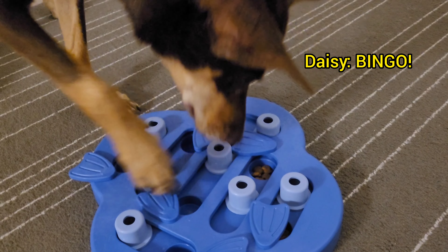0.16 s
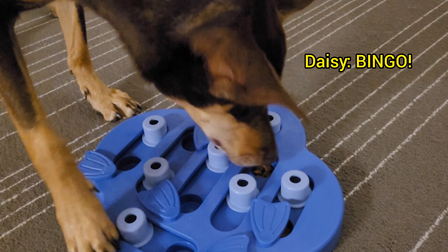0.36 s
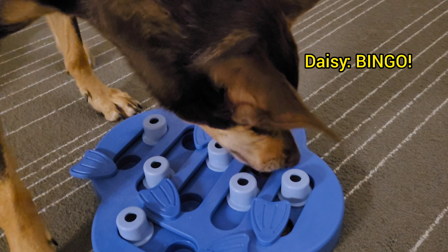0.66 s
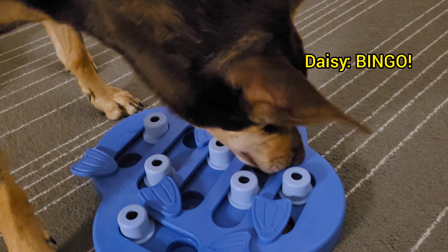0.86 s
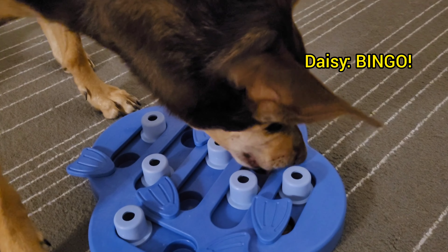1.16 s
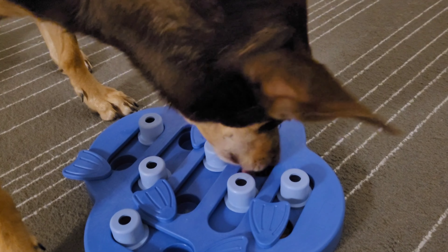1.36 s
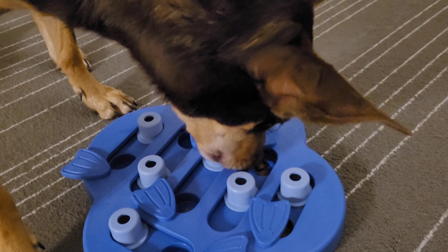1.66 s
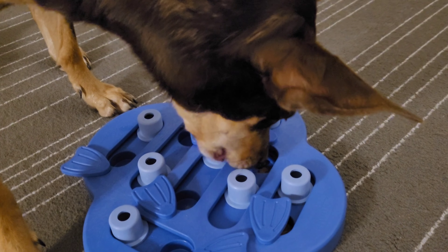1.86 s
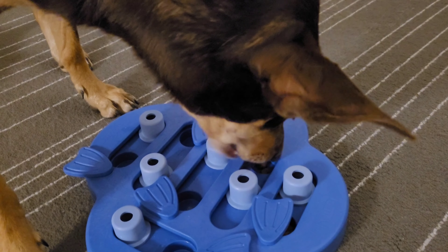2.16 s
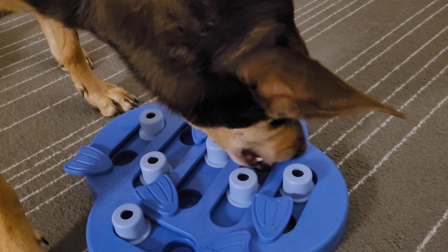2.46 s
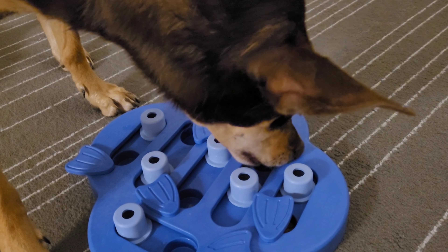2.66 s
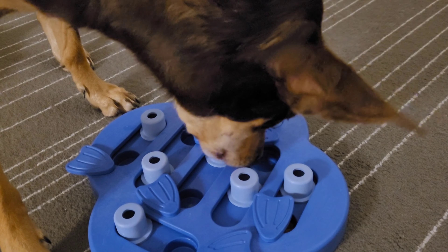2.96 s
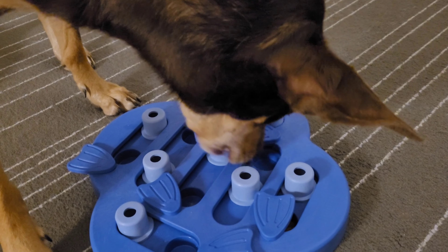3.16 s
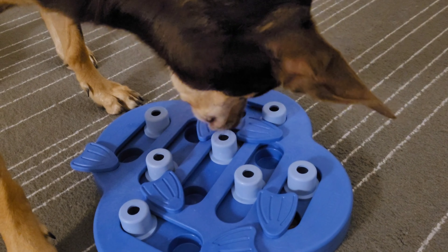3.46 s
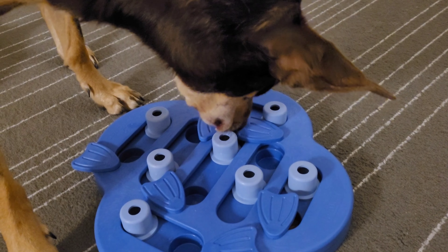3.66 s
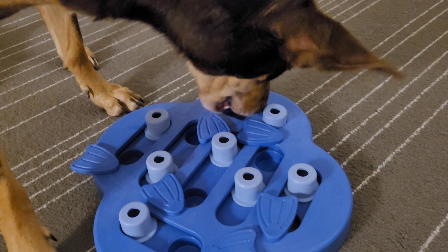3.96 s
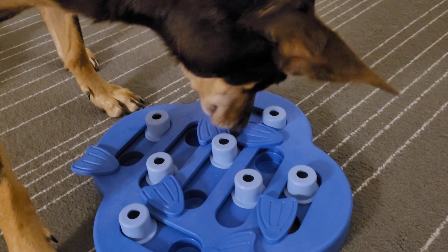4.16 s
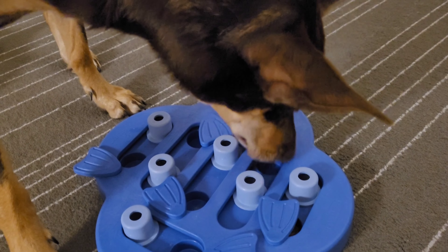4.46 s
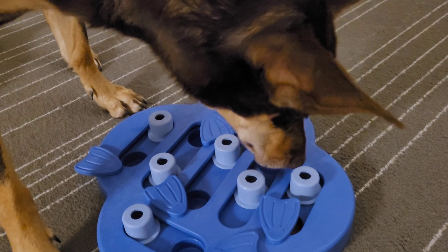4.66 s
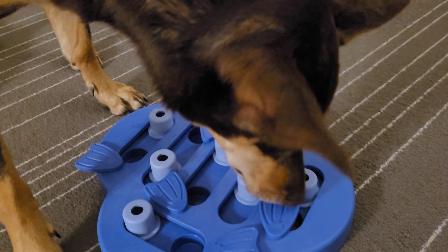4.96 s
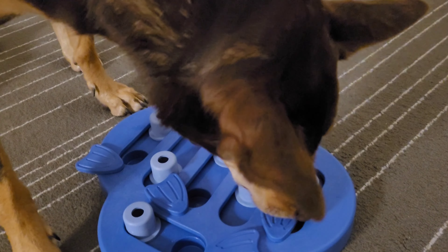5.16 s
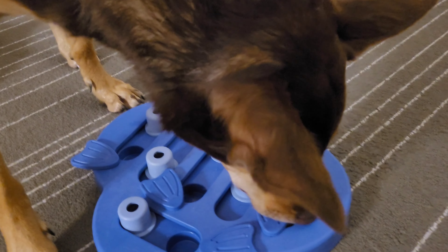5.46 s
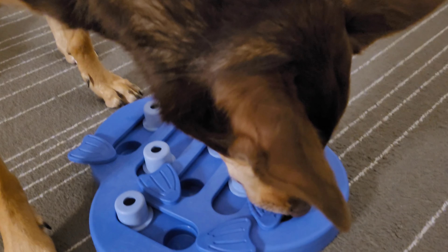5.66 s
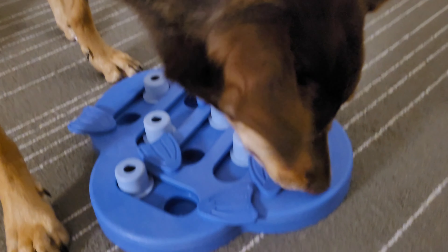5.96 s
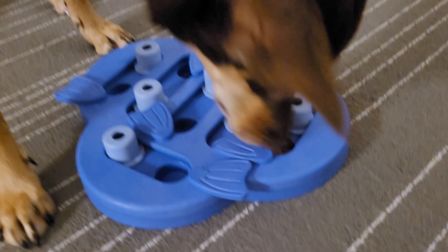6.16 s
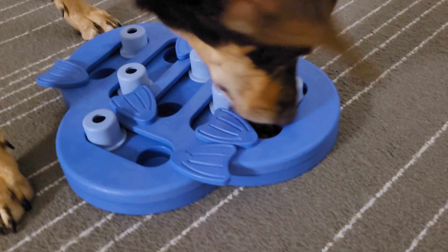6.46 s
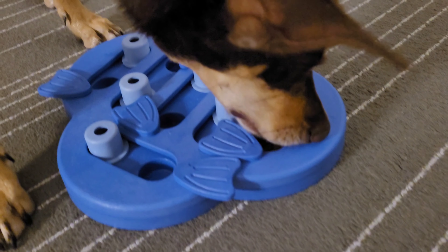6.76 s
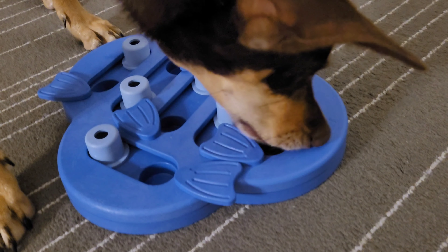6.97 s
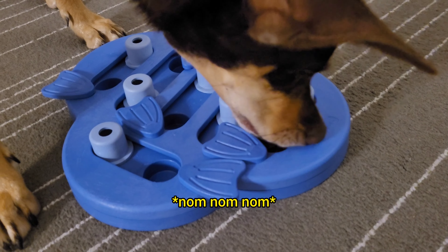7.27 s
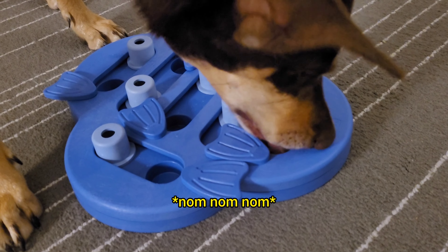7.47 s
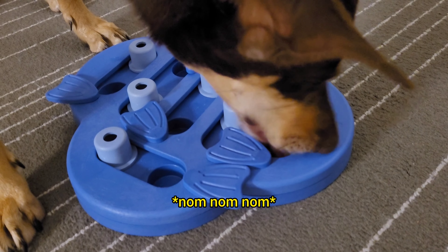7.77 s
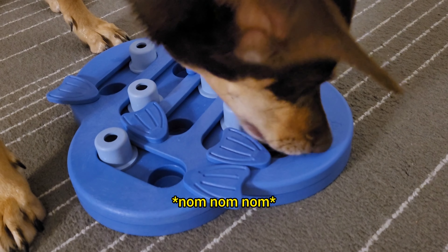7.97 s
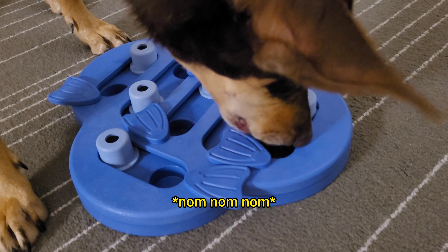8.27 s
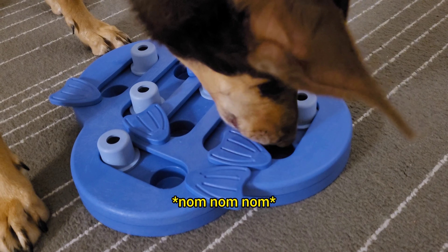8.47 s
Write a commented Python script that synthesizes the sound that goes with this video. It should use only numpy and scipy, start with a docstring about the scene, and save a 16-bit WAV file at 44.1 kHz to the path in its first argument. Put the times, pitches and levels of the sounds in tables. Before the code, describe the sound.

Hollow plastic clacks and scrapes come in scattered bursts as a dog works a treat tray, smacking its lips and licking at a rattling peg.

```python
"""Dog at a treat puzzle

A dog noses treats out of a hollow plastic tray on a living-room carpet. Sliders and lids scrape and
knock, ringing the tray's modes; teeth tick on it, fur brushes it, lips pop the mouth cavity, and the
tongue rattles a peg in a cup. Paws and the shifting tray thump through the carpet.
An appliance's faint hum and high whine hang in the room."""
import sys
import numpy as np
from scipy import signal
from scipy.fft import rfft, irfft, next_fast_len
from scipy.io import wavfile
from scipy.ndimage import uniform_filter1d, map_coordinates

SR = 44100
rng = np.random.default_rng(int(sys.argv[2]) if len(sys.argv) > 2 else 0)


def int16_out(signal):
    """Quantize to a 16-bit WAV file."""
    q = np.round(np.clip(np.atleast_2d(signal).T, -1, 1) * 32767)
    wavfile.write(sys.argv[1], SR, q.astype(np.int16))


N = 380121
HIT = 4096  # samples per contact

# blows on the tray: (time [s], level [dB], favoured ring [Hz], weight = body over clack [dB],
# hardness = snap over level [dB], room send [dB])
KNOCKS = [(0.0144, -33.5, 650, 10, -18, -5), (0.022, -36.5, 493, 1, -7.5, 3.5),
          (0.3012, -42.5, 1880, -7, 5, 3), (0.3647, -52, 1780, -6, -15, 8.5),
          (0.5452, -54.5, 630, 1.5, -11, 7.5), (0.938, -34, 735, 11, -28.5, -3.5),
          (0.9445, -36, 660, 3, -14.5, 1), (1.0657, -26, 1420, -9, -2, 0.5), (1.3681, -29, 750, 1, -9, 4),
          (1.4405, -32, 525, 4.5, -27, -3), (1.4565, -40, 616, 2, -9, 3), (1.5221, -44, 2100, -5, -13.5, 4),
          (1.8691, -56, 740, 1, -2.5, 13.5), (1.9198, -39, 1320, -1.5, -4.5, 3.5),
          (1.9616, -39, 2070, -7, -4.5, 3), (2.4943, -43, 600, 19, -20, 3.5),
          (2.8146, -27.5, 1220, 3.5, -13.5, 6), (2.8715, -31.5, 790, 2, -22, 1.5),
          (3.049, -42.5, 646, 10, -12.5, -0.5), (3.1006, -48, 630, 10.5, -30, -7),
          (3.1901, -32, 640, 3.5, -15.5, 4.5), (3.2973, -33, 855, 4, -13.5, -4),
          (3.5921, -48, 455, 18, -32, 1), (3.6455, -41, 706, 5, -30, 1),
          (3.8256, -40.5, 810, 7.5, -31, -3.5), (3.8591, -31, 1830, 3.5, -46, -4),
          (3.8668, -35.5, 770, 0, -20, 4.5), (4.0959, -38, 800, 30, -32, -2),
          (4.3538, -59.5, 785, 8, -20, 6), (4.498, -48, 687, 5.5, -7, 3.5),
          (4.714, -32, 1330, -11.5, -22.5, 3.5), (4.7515, -29.5, 1980, -20, -30, -4),
          (4.765, -29.5, 1860, -11, -23, -1.5), (5.1964, -68.5, 533, 0.5, -21, 10.5),
          (6.0933, -36, 417, 3, -9.5, 5.5), (6.1098, -43, 790, -1.5, -13, 5),
          (8.1565, -18.5, 1800, -6, -13.5, 4), (8.3409, -32.5, 740, 9.5, -6.5, -2.5),
          (8.4711, -34.5, 710, 4, -8, 1)]
# tray modes: (frequency [Hz], level [dB], t60 [s])
TRAY_MODES = [(287, -5.5, 0.062), (392.5, -7.5, 0.19), (464.4, 3, 0.03), (641, -3.5, 0.029),
              (743, 0.5, 0.011), (846, -6, 0.02), (1200, -10, .022), (1330, 3.5, 0.017), (1670, 6, 0.012),
              (1905, 9.5, 0.0058), (2010, 1.5, 0.013), (2530, -10, 0.01), (3320, -14.5, 0.003),
              (3670, -1, 0.022), (4737, 7.5, 0.0032), (5506, -2, 0.016)]
# tongue laps in the cup: (peak time [s], level [dB])
LAPS = [(6.82, -58.5), (6.97, -54), (7.16, -57.5), (7.37, -54), (7.7, -52.5), (7.92, -66), (8.12, -61.5)]
# thud, body, clack, snap and tick bands: (low edge [Hz], high edge [Hz])
REGISTERS = [(260, 540), (520, 1150), (1100, 2500), (2700, 7400), (8200, 16000)]
BANDS = [signal.butter(order, edges_hz, "band", fs=SR, output="sos")
         for order, edges_hz in zip((3, 3, 4, 4, 4), REGISTERS)]


def amp(db):
    """Decibels to gain."""
    return 10 ** (np.asarray(db) / 20)


def unit(x):
    """Scale to rms 1."""
    return x / np.sqrt(np.mean(x ** 2) + 1e-30)


def along(points, hz):
    """Interpolate (Hz, value) points on a log axis."""
    knots_hz, values = np.transpose(points)
    return np.interp(np.log(hz + 1), np.log(knots_hz + 1), values)


def filtered(x, response):
    """Apply the gain response(hz)."""
    size = x.shape[-1]
    padded = next_fast_len(size + HIT)
    return irfft(rfft(x, padded) * response(np.fft.rfftfreq(padded, 1 / SR)), padded)[..., :size]


def add(track, s, sound):
    """Mix a sound in at time s."""
    start = max(round(s * SR), 0)
    track[:, start:start + sound.shape[1]] += sound[:, :max(N - start, 0)]


def diffuse(colour, size=N):
    """Coloured stereo noise of rms 1, alike in the bass, unrelated in the treble."""
    # diffuse field: (frequency [Hz], left-right correlation [ratio])
    coherence = [(100, 0.78), (400, 0.78), (1000, 0.15), (2000, .1), (8000, 0.026)]

    def mid_side_gain(hz):
        angle = np.arccos(np.clip(along(coherence, hz), -1, 1)) / 2
        return amp(along(colour, hz)) * [np.cos(angle), np.sin(angle)]

    mid, side = filtered(rng.standard_normal((2, size)), mid_side_gain)
    return unit(np.array([mid + side, mid - side]))


def grainy(rate_hz, depth_db):
    """Randomly wavering gain of rms 1."""
    knots = rng.standard_normal(int(N * rate_hz / SR) + 4)
    return unit(amp(depth_db * map_coordinates(knots, [np.arange(N) * rate_hz / SR], order=1)))


def swells(strokes, rise):
    """Envelope of (peak s, length s, dB) strokes; rise is the share of the length spent rising."""
    t = np.arange(N) / SR
    envelope = np.zeros(N)
    for s, length_s, db in strokes:
        attack = ((t - s) / (rise * length_s)) ** 2
        decay = (t - s) / ((1 - rise) * length_s)
        envelope += amp(db) * np.exp(-np.where(t < s, attack, decay))
    return envelope


def sized(x, db):
    """Give a contact the energy of 10 ms at level db."""
    return amp(db) * unit(x) * np.sqrt(SR / 100 / HIT)


def voiced(x, bands, levels_db):
    """Set a contact's level band by band."""
    return sum(sized(signal.sosfilt(band, x), db) for band, db in zip(bands, levels_db))


def contact(modes, chatter_s, crack, scatter_db, width, bounce=0.43, crack_s=0.00085):
    """A blow and three rebounds ring the modes, each with a dry crack; width sets left and right apart."""
    t = np.arange(HIT) / SR
    blows = np.zeros(HIT)
    rebounds_s = np.clip((np.arange(1, 4) + rng.uniform(-.5, 0.54, 3)) * chatter_s / 2.4, 0, .03)
    blows[(rebounds_s * SR).astype(int)] = bounce * rng.choice([-1, 1], 3) * amp(rng.standard_normal(3))
    blows[0] = 1
    hz, db, t60_s = np.transpose(modes)[:, :, None]
    hz = hz * (1 + .008 * rng.standard_normal(hz.shape))
    # each rebound feeds every mode
    energy = signal.fftconvolve(amp(-120 * t / t60_s), blows[None] ** 2, axes=1)[:, :HIT]
    envelope = amp(db + scatter_db * rng.standard_normal(db.shape)) * np.sqrt(np.abs(energy))
    phase = 2 * np.pi * rng.random(hz.shape)
    skew = width * rng.standard_normal((2, len(hz), 1)) * np.minimum(hz / 2000, 1)
    ring = np.sum(envelope * np.sin(2 * np.pi * hz * t + phase + skew), axis=1)
    grit = rng.standard_normal(HIT) + width * rng.standard_normal((2, HIT))
    return ring + crack * grit * signal.fftconvolve(np.abs(blows), np.exp(-t / crack_s))[:HIT]


def room_tail(onset_s=0.0035, early_boost=0.97, early_s=0.02):
    """Room impulse response: strong first reflections, then each frequency dies at its own rate."""
    # room decay: (frequency [Hz], t60 [s])
    decay = [(150, 0.92), (450, 0.47), (1100, 0.54), (2800, 0.49), (7000, 0.53), (10000, 0.55),
             (15000, 0.38)]
    # reverberation colour: (frequency [Hz], gain [dB])
    colour = [(150, 3), (450, -5.5), (800, -4), (1800, -6.5), (5000, -7.5), (15000, -5)]
    noise = diffuse([(100, 0.028), (1000, 0.01)], size=SR // 2)
    hz, frame_s, spectra = signal.stft(noise, SR, nperseg=256)
    tail = signal.istft(spectra * amp(-60 * frame_s / along(decay, hz)[:, None]), SR, nperseg=256)[1]
    t = np.arange(tail.shape[1]) / SR
    tail = tail * (1 - np.exp(-(t / onset_s) ** 2)) * (1 + early_boost * np.exp(-t / early_s))
    return filtered(tail / np.linalg.norm(tail[0]), lambda hz: amp(along(colour, hz)))


def radiated(x):
    """Spectrum sent to the walls: summed over all directions, its treble ripples even out."""
    grid_hz = np.fft.rfftfreq(HIT, 1 / SR)
    power = np.mean(np.abs(rfft(x)) ** 2, axis=0)
    treble = np.clip((grid_hz - 2300) / 700, 0, 1)
    power = (1 - treble) * uniform_filter1d(power, size=7) + treble * uniform_filter1d(power, size=70)
    return lambda hz: np.interp(hz, grid_hz, np.sqrt(np.abs(power)))


def in_room(x, room_db, pan_db=-2, lag_s=0.0001):
    """Direct sound arrives earlier and brighter on the left; the room follows."""
    side = np.array([[.5], [-.5]])

    def direct_path(hz):
        left_over_right_db = pan_db + 9 * np.clip((hz - 4000) / 3000, 0, 1)
        return amp(side * left_over_right_db) * np.exp(2j * np.pi * hz * lag_s * side)

    direct = filtered(np.pad(x, ((0, 0), (16, 0))), direct_path)
    out = amp(room_db) * filtered(room_tail(), radiated(x))
    out[:, :direct.shape[1]] += direct
    return out


def background(air_db=-77, whine_db=-77):
    """Quiet room air with an appliance's wavering hum and high whine."""
    # air and whine spectra: (frequency [Hz], density [dB])
    air_colour = [(20, -21), (40, -18), (62, -4), (95, -4.5), (190, -11), (380, -5.5), (600, -11),
                  (950, -16), (2000, -20), (3000, -34), (4800, -27.5), (7900, -19.5), (9300, -26),
                  (16000, -27.5)]
    whine_colour = [(2900, -44.5), (3400, -17.5), (3850, 0.5), (4050, -17), (4400, -50), (6000, -61.5)]
    # appliance tones: (frequency [Hz], level [dB])
    tones = [(233, -85), (1071, -90.5), (3903, -83), (8048, -88.5), (8215, -94)]
    t = np.arange(N) / SR
    hum = sum(amp(db) * np.sqrt(2) * np.sin(2 * np.pi * (hz * t + rng.random((2, 1)) / 4))
              for hz, db in tones)
    whine = amp(whine_db) * diffuse(whine_colour)
    return amp(air_db) * diffuse(air_colour) + whine + hum * grainy(rate_hz=11, depth_db=4)


def drone():
    """One soft low tone that sags as it fades."""
    # tone contour: (time [s], pitch [Hz], level [dB])
    contour = [(5.902, 160, -100), (5.981, 159, -80), (6.13, 163, -62.5), (6.22, 155, -74),
               (6.28, 145, -84), (6.33, 128, -71), (6.42, 129.5, -100)]
    s, hz, db = np.transpose(contour)
    t = np.arange(N) / SR
    phase = 2 * np.pi * np.cumsum(np.interp(t, s, hz)) / SR
    return amp(np.interp(t, s, db)) * np.sqrt(2) * np.sin(phase)


def body_rush():
    """A soft rush as the dog swings round close by."""
    # rush spectrum: (frequency [Hz], density [dB])
    colour = [(25, -28), (65, 1.5), (150, -3.5), (260, -4.5), (480, -4), (800, -13), (1700, -15),
              (3000, -21), (6500, -31.5), (12000, -60)]
    return swells([(5.37, 0.2, -54)], rise=.43) * diffuse(colour) * grainy(rate_hz=110, depth_db=1.5)


def carpet(thump_s=.025, push_db=-34.5):
    """Paws, knocks and the shifting tray push dully through the carpet."""
    # paws set down: (time [s], level [dB])
    steps = [(.078, -56.5), (1.921, -58), (1.976, -56)]
    # tray shifts: (peak time [s], length [s], level [dB])
    shifts = [(6.1, 0.21, -67), (8.4, 0.59, -57.5)]
    # thump spectrum: (frequency [Hz], density [dB])
    colour = [(25, -18), (65, -2.5), (130, 0.5), (230, 4), (350, -4.5), (700, -39.5), (2000, -83)]
    pushes = [(s, thump_s, db) for s, db in steps]
    pushes += [(s, thump_s, db + push_db) for s, db, *_ in KNOCKS]
    return (swells(pushes, rise=0.05) + swells(shifts, rise=0.3)) * diffuse(colour)


def fur():
    """The muzzle brushes the tray with a thin swish."""
    # brush strokes: (peak time [s], length [s], level [dB])
    strokes = [(.475, 0.022, -60.5), (4.005, 0.08, -66.5), (5.93, 0.082, -63.5)]
    # swish spectrum: (frequency [Hz], density [dB])
    colour = [(1500, -9), (4000, -14), (6500, 2), (10000, -11), (15000, -15)]
    return swells(strokes, rise=0.39) * diffuse(colour)


def tongue(lap_s=0.21):
    """The wet tongue crackles in the cup."""
    # crackle spectrum: (frequency [Hz], density [dB])
    colour = [(150, -25.5), (480, -5.5), (1000, -5), (1500, 1), (2000, -2.5), (3700, -8), (6300, -16),
              (8500, -23), (15000, -28)]
    pressure = swells([(s, lap_s, db) for s, db in LAPS], rise=0.68)
    return pressure * diffuse(colour) * grainy(rate_hz=420, depth_db=8)


def scrapes():
    """Sliders catch and slip in their grooves."""
    # slider strokes: (peak time [s], length [s], level [dB])
    strokes = [(.005, 0.065, -48.5), (.15, 0.044, -42), (.59, 0.11, -58), (2.5, 0.051, -48.5),
               (3.6, 0.075, -62.5), (3.84, 0.11, -56), (4.11, .034, -59.5), (4.752, 0.073, -38),
               (4.9, 0.033, -57), (6.125, 0.16, -60), (6.503, 0.078, -41.5)]
    # scrape spectrum: (frequency [Hz], density [dB])
    colour = [(100, -29.5), (300, -21), (450, 4), (800, -4), (1300, -2), (2100, -8), (3000, -20.5),
              (6000, -28.5), (15000, -50)]
    return swells(strokes, rise=0.47) * diffuse(colour) * grainy(rate_hz=220, depth_db=5)


def rubbing(room_db=-1):
    """Slider and tongue friction with its reverberation."""
    direct = scrapes() + tongue()
    return direct + amp(room_db) * signal.fftconvolve(direct, room_tail(), axes=1)[:, :N]


def smacks(t60_s=0.007, wet_db=-6, wet_db_per_octave=14, tick_db=-23):
    """Parting lips pop the mouth cavity; the smaller the cavity, the louder the wet click on top."""
    # lip partings: (time [s], mouth resonance [Hz], pop level [dB])
    partings = [(0.511, 1590, -56.5), (0.6074, 1310, -56), (0.6232, 705, -42.5), (0.646, 730, -48),
                (0.6654, 1550, -41.5), (0.6824, 1367, -39), (0.7515, 1410, -54), (0.7779, 1730, -46.5),
                (0.7926, 1440, -41.5), (0.8174, 1406, -35.5), (1.055, 2370, -63), (1.8154, 1730, -57.5),
                (2.164, 1310, -52), (2.1837, 1130, -51.5), (2.239, 880, -52), (2.2546, 834, -48.5),
                (2.3886, 1230, -47), (2.4121, 1880, -46.5), (2.722, 736, -54), (3.547, 710, -56),
                (7.2247, 874, -50), (7.5488, 920, -56)]
    out = np.zeros((2, N))
    hollow = signal.butter(2, [450, 2600], "band", fs=SR, output="sos")
    for s, hz, pop_db in partings:
        cavity = [(hz, 0, t60_s), (hz * 0.53, -7, t60_s / 2)]
        pop = contact(cavity, chatter_s=.0017, crack=0.26, scatter_db=7, width=0.84,
                      bounce=0.9, crack_s=0.00042)
        snap_db = pop_db + wet_db + wet_db_per_octave * np.log2(hz / 1418)
        click = voiced(pop, BANDS[3:], [snap_db, snap_db + tick_db])
        add(out, s, in_room(sized(signal.sosfilt(hollow, pop), pop_db) + click, room_db=2.5))
    return out


def peg_rattle(jiggles_per_lap=6, lead_s=0.028, spread_s=.045, jiggle_hardness_db=-7.5):
    """The tongue flicks a peg against its cup; every lap also jiggles it at random."""
    # peg flicks: (time [s], level [dB], hardness = snap over level [dB])
    flicks = [(6.7222, -39.5, -3.5), (6.7859, -43, 0.5), (6.8139, -34.5, -1), (6.8288, -37, -5),
              (6.9157, -42, -15), (6.9291, -47, 4), (6.9499, -44, -2), (6.9862, -42, 2.5),
              (7.087, -31.5, -4.5), (7.104, -39.5, -3), (7.2506, -52.5, 1.5), (7.2746, -51.5, 3),
              (7.3, -42.5, -8), (7.313, -39.5, -20), (7.3567, -39, -13), (7.3735, -39.5, -5.5),
              (7.5173, -55.5, 3), (7.5715, -43.5, 6), (7.6209, -33.5, -1), (7.7149, -35.5, -1.5),
              (7.8653, -51, 3), (7.9119, -37.5, -5.5), (8.0913, -42.5, 3.5), (8.1251, -43.5, -11)]
    # cup modes: (frequency [Hz], level [dB], t60 [s])
    cup_modes = [(488, -2.5, 0.053), (770, -9.5, 0.072), (877, -11, 0.015), (1232, -15.5, 0.056),
                 (1883, 5.5, 0.024), (2170, 3, 0.011), (2524, 1.5, 0.01), (3185, 12.5, 0.0018),
                 (5090, 8.5, 0.0041), (6040, -0.5, 0.023), (6600, -7, 0.013)]
    out = np.zeros((2, N))
    jiggles = [(s - lead_s + spread_s * when, db + 1.5 + 2 * size, jiggle_hardness_db)
               for s, db in LAPS for when, size in rng.standard_normal((jiggles_per_lap, 2))]
    for s, db, hardness_db in list(flicks) + jiggles:
        snap_db = db + hardness_db
        ring = contact(cup_modes, chatter_s=0.0036, crack=1.77, scatter_db=4, width=0.98,
                       bounce=0.29, crack_s=0.0016)
        hit = voiced(ring, BANDS, [db - 19.5, db - 13.5, db, snap_db, snap_db - 22.5])
        add(out, s, in_room(hit, room_db=0.5, pan_db=-1.5))
    return out


def nips(snap_db=-5.5):
    """A tooth clips the tray and stirs only its top two bands."""
    # tooth contacts: (time [s], tick level [dB])
    ticks = [(0.0207, -51), (0.3223, -53), (1.893, -54.5), (1.9204, -56), (1.962, -55), (2.0633, -48),
             (2.071, -56), (3.047, -60.5), (6.0925, -55.5), (3.267, -61.5), (8.3412, -44.5)]
    out = np.zeros((2, N))
    for s, db in ticks:
        ring = contact(TRAY_MODES, chatter_s=0.0018, crack=8.7, scatter_db=0, width=0.67)
        tick = voiced(ring, BANDS[3:], [db + snap_db, db])
        add(out, s, in_room(tick, room_db=2))
    return out


def struck_tray(ring_hz, favour_db=7, width_octaves=0.096):
    """The place of a blow favours the tray modes near one pitch."""
    return [(hz, db + favour_db * np.exp(-(np.log2(hz / ring_hz) / width_octaves) ** 2), t60_s)
            for hz, db, t60_s in TRAY_MODES]


def knocks(graze_db=-21, graze_lead_s=0.0043, graze_cutoff_hz=1800):
    """Sliders and lids graze the tray, then strike: heavy blows boom, light ones clack, hard ones snap."""
    out = np.zeros((2, N))
    soft = signal.butter(2, graze_cutoff_hz, fs=SR, output="sos")
    for s, db, ring_hz, weight_db, hardness_db, room_db in KNOCKS:
        body_db = db + min(weight_db, 0)
        clack_db = db - max(weight_db, 0)
        thud_db = (body_db + clack_db) / 2 - 10.5
        snap_db = db + hardness_db
        ring = contact(struck_tray(ring_hz), chatter_s=.004, crack=3.4, scatter_db=3, width=1)
        hit = voiced(ring, BANDS, [thud_db, body_db, clack_db, snap_db, snap_db - 19.5])
        add(out, s - graze_lead_s, amp(graze_db) * signal.sosfilt(soft, hit))
        add(out, s, in_room(hit, room_db))
    return out


def scene():
    """Stereo sum of tray, dog and room."""
    contacts = knocks() + nips() + peg_rattle() + smacks()
    return contacts + rubbing() + fur() + body_rush() + carpet() + drone() + background()


def record(dry):
    """Steep low-pass at 16 kHz."""
    return filtered(dry, lambda hz: 1 / (1 + (hz / 16000) ** 120))


dry = scene()
out = record(dry)
int16_out(out)
```